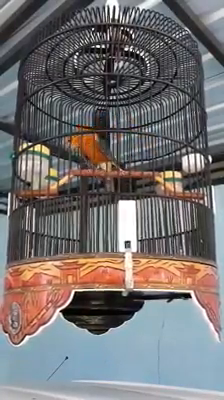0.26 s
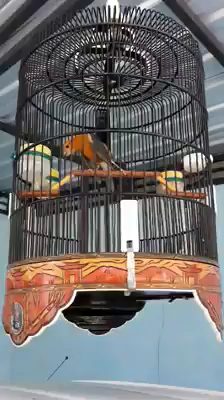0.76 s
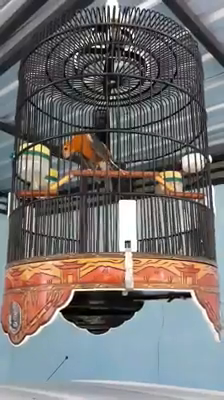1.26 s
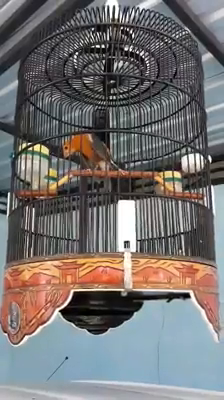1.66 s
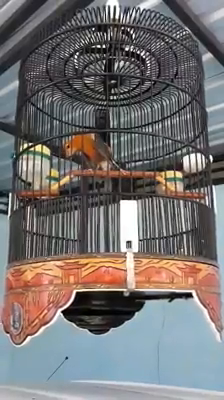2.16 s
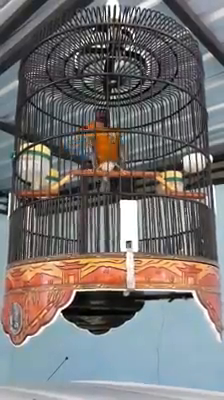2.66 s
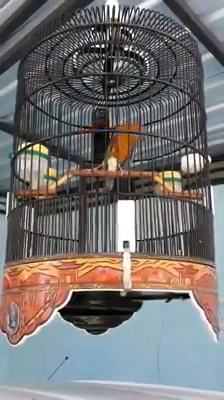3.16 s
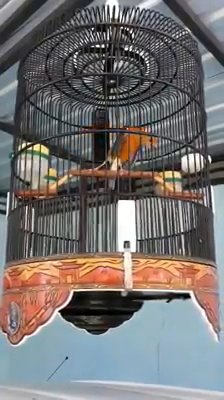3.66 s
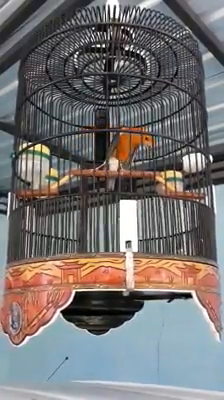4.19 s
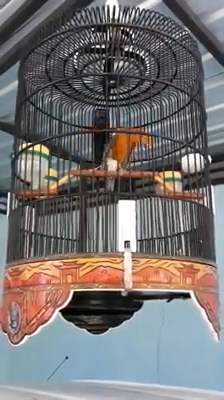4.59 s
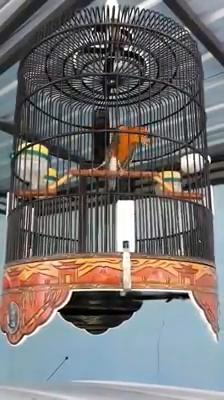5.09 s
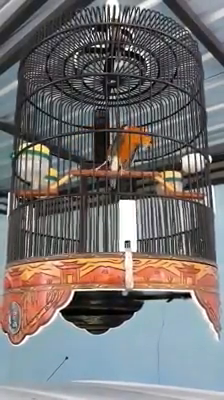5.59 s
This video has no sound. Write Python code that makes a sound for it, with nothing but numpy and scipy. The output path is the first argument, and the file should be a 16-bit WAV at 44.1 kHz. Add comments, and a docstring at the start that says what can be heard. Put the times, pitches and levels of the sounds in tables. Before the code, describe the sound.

Close phone pickup of one bird in a hard, bright roofed space. Thin shrill trills with gaps between give way to a chip, quiet upward chucks, a scratchy screech and a rapid even rattle of whistled notes. After about a second of near quiet, a strong descending warble and two bright double slurs follow, then a softer rising warble. Soft swishes and distant rumble stay far beneath.

```python
"""A caged thrush: three high buzzy trills, a chip, chucks, a rattle of short arches, warbles, two-voiced slurs.
Each note is a whistle with harmonics and air rasp, driven along pitch and level curves. Scattered echoes and a
noise tail ring under a sheet-metal roof; a trill just before the start leaves its ring. Filtered noise makes
distant rumble, soft swishes, even hiss and one stretch of an 8-10 kHz band. A phone a step away bends loud
waves, dips above 8 kHz and limits peaks. The treble flickers in narrow bands."""
import sys
import numpy as np
from scipy import signal
from scipy.fft import rfft, irfft
from scipy.io import wavfile
from scipy.ndimage import uniform_filter1d, minimum_filter1d

SR = 44100
rng = np.random.default_rng(int(sys.argv[2]) if len(sys.argv) > 2 else 0)


def store_wav(level_fs):
    """Save 16-bit WAV to argv[1]."""
    pcm = np.round(np.clip(np.atleast_2d(level_fs), -1, 1) * 32767)
    wavfile.write(sys.argv[1], SR, pcm.T.astype(np.int16))


def ratio_of_db(decibels):
    """Turn decibels (scalar or array-like) into linear amplitude factors; 0 dB maps to 1."""
    return 10 ** (np.asarray(decibels, float) / 20)


N = 257544
LEAD_SAMPLES = 8192  # song begins this early

# Far rumble: t/s, level/dB
RUMBLE_LEVEL = [(0.0, -47.5), (0.83, -53), (0.89, -42), (1.01, -51.5), (2.6, -52.5), (3.17, -44.5),
                (3.89, -44.5), (3.95, -50), (4.67, -41), (4.81, -48.5), (4.93, -47), (5.58, -53.5),
                (5.84, -50)]
# Rumble spectrum: f/Hz, density/dB
RUMBLE_SPECTRUM = [(15, -67.5), (25, -46.5), (76, -7.5), (101, -1.5), (260, -5.5), (323, -11.5),
                   (464, -8.5), (868, -18.5), (1410, -19), (2280, -24.5), (3200, -24.5), (8000, -34.5),
                   (10400, -70.5), (17600, -120)]
# Soft broad swishes: start t/s, length/s, level/dB
SWISH_EVENTS = [(0.202, 0.062, -47.5), (0.495, 0.086, -51), (0.793, 0.059, -54), (1.165, 0.065, -49.5),
                (1.469, 0.093, -52), (2.865, 0.079, -45.5), (3.358, 0.19, -46.5), (3.886, 0.07, -45.5),
                (4.54, 0.1, -43.5)]
# Swish spectrum: f/Hz, density/dB
SWISH_SPECTRUM = [(240, -26), (400, 8.5), (520, -11.5), (768, -1), (1570, -7), (4380, -4), (8000, -15),
                  (10400, -62.5), (17600, -120)]
# Noise band at 8-10 kHz, present for one stretch: t/s, level/dB
TREBLE_BAND_LEVEL = [(1.46, -61), (1.475, -32), (1.58, -27), (1.885, -31.5), (1.9, -59)]
# Decay of the hard space: f/Hz, t60/s
ROOM_T60 = [(1500, .5), (3000, 0.38), (5000, 0.35), (7500, 0.31), (12000, 0.24)]
# Phone response: f/Hz, gain/dB
PHONE_RESPONSE = [(1000, 0), (7700, 1), (8200, -15.5), (8500, -21.5), (10000, -12.5), (11500, -17),
                  (14800, -11), (15800, -19.5), (16100, -61)]

# Air noise of the syrinx: f/Hz, gain/dB
RASP_SPECTRUM = [(1200, -28.5), (2500, -5), (5000, 1), (8000, -6), (15000, -5.5)]
# Beak half-shut, all notes but trills, rattle arches and warbles: f/Hz, gain/dB
BEAK_RESPONSE = [(1500, 3), (3000, -2.5), (4200, -0.5), (5500, 1), (6500, 5.5), (7200, -6.5), (8000, -6),
                 (12000, 3)]
# Roughness by kind of note [0-1]
ROUGHNESS = dict(chuck=.4, chip=.15, croak=.55, lead=.35, screech=.3, buzz=.7, rattle_lead=.1, warble=.05)
CLEAR_ROUGHNESS = .04  # trills, rattle arches, rises, falls

# Voices: 2nd, 3rd, 4th harmonic/dB, step to each further one/dB, air rasp/dB
# Events of gliding notes: start t/s, length/s, from f/Hz, to f/Hz, level/dB
# Shapes of gliding notes: share of length, share of glide, level/dB, overtones/dB
# Chucks: events, shape, voice
CHUCK_EVENTS = [(1.884, 0.059, 1561, 2006, -26.5), (2.159, 0.057, 1439, 1974, -27),
                (2.443, 0.066, 1490, 1983, -28)]
CHUCK_SHAPE = [(0, 0.18, -20.5, 1), (.15, .2, -16, 10), (.5, .38, -7.5, 9.5), (.65, .58, -3, 4.5),
               (.82, .88, 2.5, -6.5), (1, 1, -7, -12)]
CHUCK_TIMBRE = (-4, 3, 8, -5, 1)
# Rising slurs: events, shape, voice
RISE_EVENTS = [(5.051, .086, 3878, 4850, -2.5), (5.338, 0.078, 4230, 4948, -4.5)]
RISE_SHAPE = [(0, 0.055, -22, 0.0043), (.1, .06, -8, 0), (.3, .34, -2, 0.0091), (.6, .62, 2, 0),
              (.88, .94, -2, 0), (1, 0.69, -10, 0.0046)]
RISE_TIMBRE = (-21.5, -30.5, -39, -14, -35)
# Falling slurs: events, shape, voice
FALL_EVENTS = [(3.113, 0.072, 3305, 3137, -11), (5.1, 0.12, 3674, 3426, -2), (5.384, 0.092, 3720, 3393, -6)]
FALL_SHAPE = [(.12, 0.17, -12.5, 3), (.3, .12, -2.5, 1.5), (.55, .38, -0.5, 0), (.85, .78, -3, -2.5),
              (1, 1, 0, -8.5)]
FALL_TIMBRE = (-14.5, -30.5, -27.5, -8, -26.5)
# Ends of each fall: scoop from f/Hz, drop to f/Hz, drop/s
FALL_SCOOPS_DROPS = [(1970, 2950, .012), (3300, 3400, .01), (3100, 2150, .03)]
# Knee of a drop: share of time, share of pitch and fade
DROP_KNEE_SHARES = (.5, .28)
SCOOP_DB, DROP_DB, DROP_DULLS_DB = -16, -31, -11.5

# Notes sung once: t/s, f/Hz, level/dB, overtones/dB; overlaps are the two halves of the syrinx
# Chip and its croak, each with its voice
CHIP_NOTE = [(1.583, 2395, -38, 6.5), (1.592, 3810, -21.5, 10.5), (1.602, 5090, -6.5, -11),
             (1.61, 5105, -5, -1), (1.614, 4210, -11.5, 6), (1.619, 2816, -19, 8), (1.626, 1890, -13, 10)]
CHIP_TIMBRE = (-4.5, -12, -14, -19.5, -9.5)
CROAK_NOTE = [(1.604, 1634, -50, 14), (1.641, 1640, -39, 6), (1.69, 1443, -47, 10)]
CROAK_TIMBRE = (2.5, -22.5, -28, -29, 9)
# Screech: lead, main note and buzz, each with its voice
SCREECH_LEAD_NOTE = [(2.749, 1576, -32.5, 0), (2.764, 2140, -15, 0.0026), (2.775, 1800, -23, 0),
                     (2.791, 1710, -41.5, 0)]
SCREECH_LEAD_TIMBRE = (-35, -45, -35, -28, -18.5)
SCREECH_NOTE = [(2.75, 3098, -45, -22), (2.756, 3335, -33, -17), (2.775, 2992, -20, -16),
                (2.792, 2667, -21, -16), (2.812, 2354, -10.5, -16.5), (2.83, 2081, -23, 6.5),
                (2.887, 1968, -23.5, 11.5), (2.9, 1850, -29, 12.5), (2.909, 1700, -35.5, 17)]
SCREECH_TIMBRE = (-8, -9, -3, -11.5, -5.5)
SCREECH_BUZZ_NOTE = [(2.815, 4235, -29, 0), (2.832, 4490, -12.5, 0), (2.86, 4770, -24.5, 0),
                     (2.9, 5400, -23.5, 0)]
SCREECH_BUZZ_TIMBRE = (-21, -14, -24, -6, 1.5)
# Rise into the rattle, and its voice
RATTLE_LEAD_NOTE = [(3.155, 3435, -21, -1.5), (3.166, 3660, -13.5, 2.5), (3.191, 3800, -12, -2),
                    (3.202, 3945, -3, -5.5), (3.213, 3920, -9, -10.5)]
RATTLE_LEAD_TIMBRE = (-3, -24.5, -8, -19, -22)

# Rattle arches: start t/s, top f/Hz, level/dB
RATTLE_EVENTS = [(3.223, 4000, -7), (3.272, 3713, -11), (3.327, 3630, -10.5), (3.376, 3587, -12),
                 (3.423, 3610, -8.5), (3.474, 3580, -11), (3.529, 3490, -13), (3.582, 3564, -11)]
# One arch: share of length, pitch factor, level/dB
ARCH_SHAPE = [(0, .74, -12), (.06, .89, -9), (.17, .97, -5), (.45, 1.0, -1), (.72, .995, 0), (.88, .96, -6),
              (1, .87, -14)]
# Rattle voice
RATTLE_TIMBRE = (-15, -27.5, -13, -23, -26.5)
ARCH_S = .034
RATTLE_BRIGHT_DB, RATTLE_DULLS_DB_PER_S = 9.5, -40.5  # overtones of first arch, and their slope

# Trills of six down-sweeps: start t/s, top f/Hz, drop/Hz, level/dB
TRILL_EVENTS = [(-.118, 7700, 862, 0), (.192, 7800, 1046, -3.5), (0.594, 7670, 1054, -5),
                (.843, 7727, 1163, -4)]
# Sweep period of each trill/s
TRILL_PERIODS_S = [.0138, .0141, .0135, .0147]
# One sweep: share of period, share of drop, level/dB
SWEEP_SHAPE = [(0, .4, -16), (.12, 0, -9), (.35, .35, -6), (.6, .75, 0), (.78, 1.0, -12)]
# Along a trill: sweep number, pitch factor, level/dB
TRILL_COURSE = [(0, .96, -7.5), (0.999, .99, -1), (3.999, 1.01, 0.5), (5, 1.01, -10)]
# Trill voice
TRILL_TIMBRE = (-16, -32, -40, -9, -29)

# Warbles: t/s, crest f/Hz, dip below crest/Hz, level/dB, overtones/dB
WARBLE_NOTES = [
    [(4.668, 2700, -4.5, -29.5, 5), (4.678, 3175, 18, -10.5, 9.5), (4.692, 3090, 38.5, -3.5, 6.5),
     (4.726, 3014, 176.5, -2.5, -6), (4.752, 3110, 331, -0.5, 6), (4.775, 3220, 468.5, -3.5, 0.5),
     (4.829, 3323, 655, -6.5, -4.5), (4.879, 3123, 772.5, -7, -3), (4.928, 2715, 503.5, -4.5, -9),
     (4.948, 2488, 260, -5, -3.5), (4.962, 2345, 100, -15.5, -7)],
    [(5.58, 2140, 1, -34.5, 0.5), (5.596, 2396, 0.63, -18, -1.5), (5.63, 2469, 1, -12, -13.5),
     (5.71, 2632, 1, -10.5, -4), (5.745, 2713, 1, -9, -7), (5.766, 3020, 1, -16.5, 8),
     (5.774, 3430, 1600, -12.5, 1.5), (5.794, 3620, 1350, -15.5, -3), (5.815, 3415, 1450, -15.5, 3.5),
     (5.839, 3274, 790, -18.5, -6.5)],
]
# Vibrato of each warble: crest t/s, turn/s
WARBLE_VIBRATOS = [(4.726, .0254), (5.7722, .0284)]
# Warble voices
WARBLE_TIMBRES = [(-29, -42.5, -19, -0.48, -38.5), (-32.5, -29, -20, -1.5, -59)]


def colour(x, points):
    """Filter by (Hz, dB) points, interpolated over log frequency."""
    hz, db = np.transpose(points)
    f_hz = np.maximum(np.arange(len(x) // 2 + 1) * SR / len(x), 1)
    gain_db = np.interp(np.log(f_hz), np.log(hz), db)
    return irfft(rfft(x) * ratio_of_db(gain_db), len(x))


def unit(x):
    """Scale to rms 1."""
    return x / np.sqrt(np.mean(x ** 2))


def walk(rate_hz, size):
    """Smooth random wander of rms 1: noise averaged twice over 1/rate_hz."""
    k = int(SR / rate_hz)
    smooth = uniform_filter1d(rng.standard_normal(size), k)
    return unit(uniform_filter1d(smooth, k))


def noise(size, points):
    """White noise filtered by (Hz, dB) points."""
    return colour(rng.standard_normal(size), points)


def level_curve(rows):
    """Amplitude over the scene from (s, dB) rows."""
    s, db = np.transpose(rows)
    return ratio_of_db(np.interp(np.arange(N) / SR, s, db))


def hiss():
    """Even hiss: treble noise with a slow level wander."""
    treble = noise(N, [(7000, 4.5), (10000, -8), (13000, 12.5)])
    return ratio_of_db(-57) * treble * ratio_of_db(1.5 * walk(5, N))


def rumble():
    """Far rumble: low noise on a level curve, wandering in level."""
    return unit(noise(N, RUMBLE_SPECTRUM)) * level_curve(RUMBLE_LEVEL) * ratio_of_db(1.8 * walk(9, N))


def treble_band():
    """Noise band at 8-10 kHz, present for one stretch."""
    band = noise(N, [(7950, -68), (8100, 1.5), (10200, -6.5), (10400, -64.5)])
    return unit(band) * level_curve(TREBLE_BAND_LEVEL)


def swishes():
    """Soft swishes: broad noise that starts quickly and fades."""
    t = np.arange(N) / SR
    envelope = 0
    for start, length, db in SWISH_EVENTS:
        corners_s = [start, start + 0.003, start + length, start + 1.6 * length]
        envelope = envelope + ratio_of_db(db) * np.interp(t, corners_s, [0.02, 1, 0.66, 0.029])
    broad = unit(noise(N, SWISH_SPECTRUM + [(16000, -46.5)]))
    return broad * envelope * ratio_of_db(2.0 * walk(60, N))


def background():
    """Sum of the noise layers."""
    return rumble() + swishes() + treble_band() + hiss()


def room(x):
    """Close scattered echoes from cage and roof, then a noise tail that dies band by band."""
    t = np.arange(SR) / SR

    def fade(t60_s):
        return np.exp(-np.log(1000) * t / t60_s)

    sparse = rng.standard_normal(SR) * (rng.random(SR) < .02)
    echoes = sparse * fade(.12) * (t > .008)
    tail = 0
    for k, (_, t60_s) in enumerate(ROOM_T60):
        band = [(hz, 0 if j == k else -30) for j, (hz, _) in enumerate(ROOM_T60)]
        tail = tail + noise(SR, band) * fade(t60_s)
    tail = tail * np.minimum(1, t / 0.0088)
    tail = unit(colour(tail, [(800, -10.5), (2000, 14)]))
    answer = (ratio_of_db(-10) * unit(echoes) + ratio_of_db(-8) * tail) / np.sqrt(SR)
    return x + signal.fftconvolve(x, answer)[:len(x)]


def add(air, start_s, x):
    """Mix x into the air, which begins LEAD_SAMPLES early."""
    i = int(start_s * SR) + LEAD_SAMPLES
    air[i:i + len(x)] += x[:len(air) - i]


def syrinx(hz, db, bright_db, voice, rough):
    """Membrane whistle with harmonics and air rasp; roughness shakes pitch and level."""
    second_db, third_db, fourth_db, step_db, rasp_db = voice
    size = len(hz)
    hz = uniform_filter1d(hz, size=90, mode="nearest")  # the muscles round every corner
    phase = 2 * np.pi * np.cumsum(hz * (1 + .04 * rough * walk(700, size))) / SR
    levels_db = [second_db, third_db] + [fourth_db + k * step_db for k in range(7)]
    upper = 0
    for harmonic, harmonic_db in enumerate(levels_db, 2):
        audible = harmonic * hz < .45 * SR
        upper = upper + ratio_of_db(harmonic_db) * np.sin(harmonic * phase) * audible
    upper = upper * ratio_of_db(3.5 * walk(350, size))  # overtones flutter on their own
    rasp = ratio_of_db(rasp_db) * noise(size, RASP_SPECTRUM)
    n = np.arange(size)
    edge = np.minimum(1, np.minimum(n, n[::-1] / 5) / (.001 * SR))  # 1 ms in, 5 ms out
    tone = np.sin(phase) + ratio_of_db(bright_db) * (upper + rasp)
    return tone * edge * ratio_of_db(db + 6.1 * rough * walk(400, size))


def sing(air, rows, voice, rough):
    """One note from (s, Hz, dB, overtones dB) rows."""
    s, *columns = np.transpose(rows)
    t = np.arange(s[0], s[-1], 1 / SR)
    hz, db, bright_db = (np.interp(t, s, c) for c in columns)
    add(air, s[0], syrinx(hz, db, bright_db, voice, rough))


def glide(row, shape):
    """Rows of one gliding note from its event and the shape of its kind."""
    start, length, from_hz, to_hz, db = row
    return [(start + u * length, from_hz + g * (to_hz - from_hz), db + shape_db, bright_db)
            for u, g, shape_db, bright_db in shape]


def chucks(air):
    """Rough low notes gliding upward."""
    for row in CHUCK_EVENTS:
        sing(air, glide(row, CHUCK_SHAPE), CHUCK_TIMBRE, ROUGHNESS["chuck"])


def slurs(air):
    """Rises, and falls scooped into and dropped out of; overlaps sound two-voiced."""
    for row in RISE_EVENTS:
        sing(air, glide(row, RISE_SHAPE), RISE_TIMBRE, CLEAR_ROUGHNESS)
    time_share, share = DROP_KNEE_SHARES
    for row, (scoop_hz, drop_hz, drop_s) in zip(FALL_EVENTS, FALL_SCOOPS_DROPS):
        body = glide(row, FALL_SHAPE)
        first, last = body[0], body[-1]
        scoop = (row[0], scoop_hz, row[-1] + SCOOP_DB, first[-1])
        drop = (last[0] + drop_s, drop_hz, row[-1] + DROP_DB, last[-1] + DROP_DULLS_DB)
        knee = np.add(last, np.subtract(drop, last) * [time_share, share, share, share])
        sing(air, [scoop, *body, knee, drop], FALL_TIMBRE, CLEAR_ROUGHNESS)


def single_notes(air):
    """Rattle lead, chip with croak, and screech: overlapping voices on drawn curves."""
    sing(air, RATTLE_LEAD_NOTE, RATTLE_LEAD_TIMBRE, ROUGHNESS["rattle_lead"])
    sing(air, CHIP_NOTE, CHIP_TIMBRE, ROUGHNESS["chip"])
    sing(air, CROAK_NOTE, CROAK_TIMBRE, ROUGHNESS["croak"])
    sing(air, SCREECH_LEAD_NOTE, SCREECH_LEAD_TIMBRE, ROUGHNESS["lead"])
    sing(air, SCREECH_NOTE, SCREECH_TIMBRE, ROUGHNESS["screech"])
    sing(air, SCREECH_BUZZ_NOTE, SCREECH_BUZZ_TIMBRE, ROUGHNESS["buzz"])


def trills(air):
    """Runs of six down-sweeps, quick enough to buzz."""
    number, factor, swell_db = np.transpose(TRILL_COURSE)
    for (start, top_hz, drop_hz, db), period_s in zip(TRILL_EVENTS, TRILL_PERIODS_S):
        rows = []
        for k in range(6):
            sweep_top_hz = np.interp(k, number, factor) * top_hz
            run_db = db + np.interp(k, number, swell_db)
            for u, d, sweep_db in SWEEP_SHAPE:
                rows.append((start + (k + u) * period_s, sweep_top_hz - d * drop_hz, run_db + sweep_db, 0))
        sing(air, rows, TRILL_TIMBRE, CLEAR_ROUGHNESS)


def rattle(air):
    """Short pitch arches whose overtones fade from first to last."""
    for start, top_hz, db in RATTLE_EVENTS:
        bright_db = RATTLE_BRIGHT_DB + RATTLE_DULLS_DB_PER_S * (start - RATTLE_EVENTS[0][0])
        rows = [(start + u * ARCH_S, factor * top_hz, db + arch_db, bright_db)
                for u, factor, arch_db in ARCH_SHAPE]
        sing(air, rows, RATTLE_TIMBRE, CLEAR_ROUGHNESS)


def vibrato(rows, crest_s, turn_s):
    """Rows of a vibrato that slides down for most of each turn, then snaps back up more faintly."""
    s, *columns = np.transpose(rows)
    t = np.arange(s[0], s[-1], .001)
    crest_hz, dip_hz, db, bright_db = (np.interp(t, s, c) for c in columns)
    turn = (t - crest_s) / turn_s % 1
    swing = np.interp(turn, [0, .1, .62, .74, 1], [0, .04, .95, 1, 0])
    swing = uniform_filter1d(swing, size=3)
    snap = np.interp(turn, [0, .12, .75, .9, 1], [.6, 0, 0, 1, .6])
    snap_db = -5.0 * snap * dip_hz / dip_hz.max()
    return np.transpose([t, crest_hz - dip_hz * swing, db + snap_db, bright_db])


def warbles(air):
    """Long notes with a lopsided vibrato."""
    for rows, (crest_s, turn_s), voice in zip(WARBLE_NOTES, WARBLE_VIBRATOS, WARBLE_TIMBRES):
        sing(air, vibrato(rows, crest_s, turn_s), voice, ROUGHNESS["warble"])


def thrush():
    """Whole song, dry; the half-shut beak filters only the first three groups."""
    air = np.zeros(N + LEAD_SAMPLES)
    chucks(air)
    slurs(air)
    single_notes(air)
    air = colour(air, BEAK_RESPONSE)
    trills(air)
    rattle(air)
    warbles(air)
    return air


def scene():
    """Bird in its space over the background."""
    return (room(thrush())[LEAD_SAMPLES:] + background())[None]


def flicker_treble(x):
    """The treble flickers: narrow bands above 8.4 kHz wander in gain, each on its own."""
    for hz in np.arange(8800, 16000, 600):
        band = colour(x, [(hz - 400, -80), (hz - 300, -3), (hz, 0), (hz + 300, -3), (hz + 400, -80)])
        x = x + band * (.6 * walk(900, N) - .3)
    return x


def roll_off(x):
    """The treble ends steeply here."""
    return signal.sosfilt(signal.butter(12, 16130, fs=SR, output="sos"), x)


def record(dry):
    """Loud waves bend, the treble flickers, the phone response dips above 8 kHz, peaks are limited."""
    x = dry[0] - .05 * dry[0] ** 3  # two voices at once gain faint side tones
    x = flicker_treble(x)
    x = colour(x, PHONE_RESPONSE)
    x = colour(x, [(15900, 0), (16130, -70)])
    peak = -minimum_filter1d(-np.abs(x), size=260)  # the limiter looks about 3 ms ahead
    limit_gain = np.minimum(1, .96 / (peak + 1e-9))
    mix = x * uniform_filter1d(limit_gain, size=130)
    return roll_off(mix[None])


dry = scene()
out = record(dry)
store_wav(out)
```